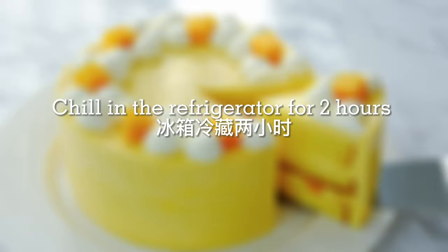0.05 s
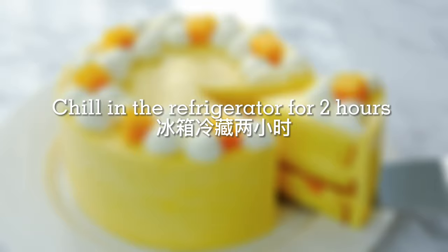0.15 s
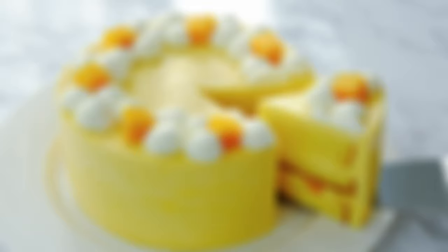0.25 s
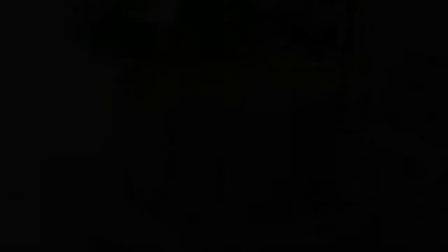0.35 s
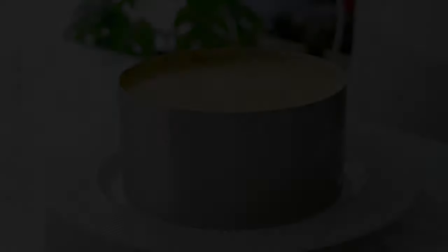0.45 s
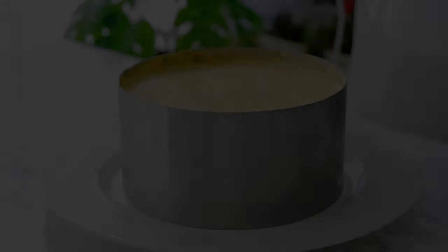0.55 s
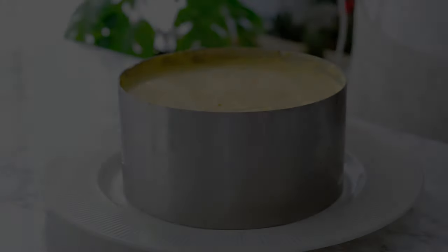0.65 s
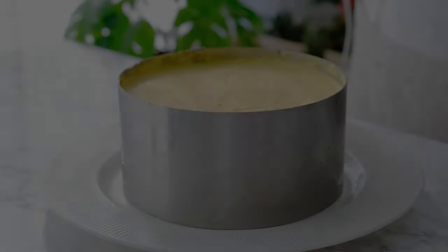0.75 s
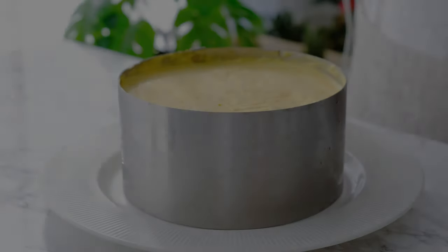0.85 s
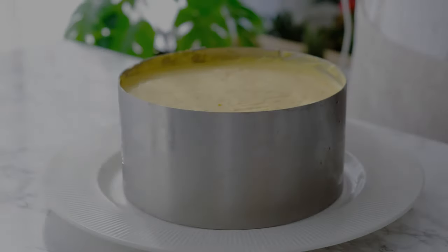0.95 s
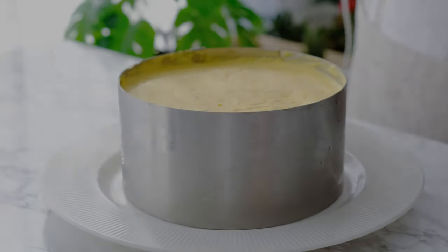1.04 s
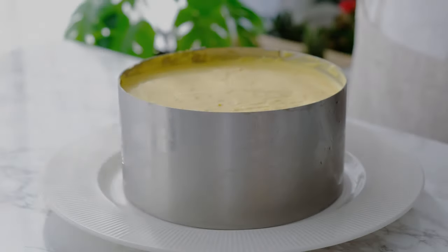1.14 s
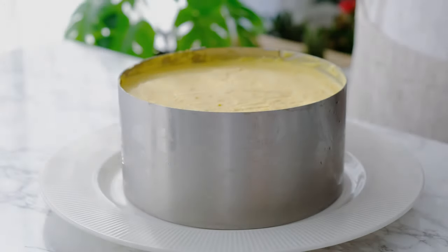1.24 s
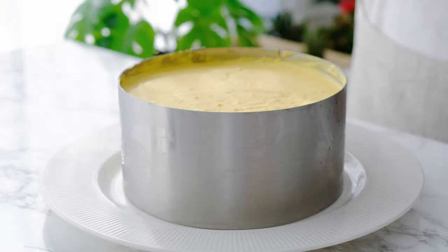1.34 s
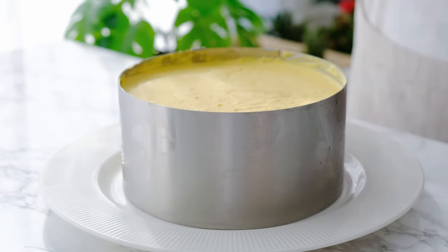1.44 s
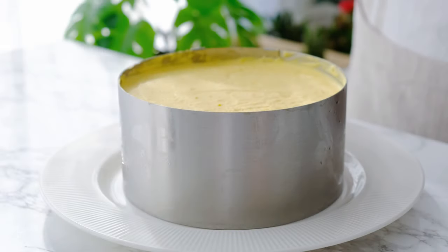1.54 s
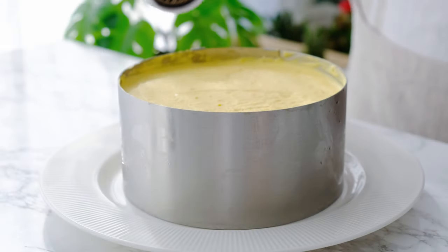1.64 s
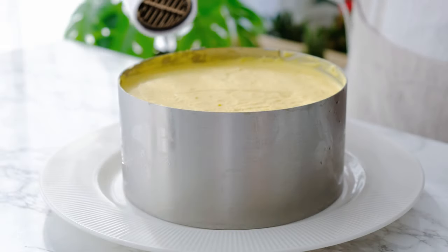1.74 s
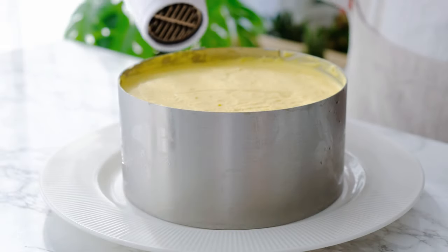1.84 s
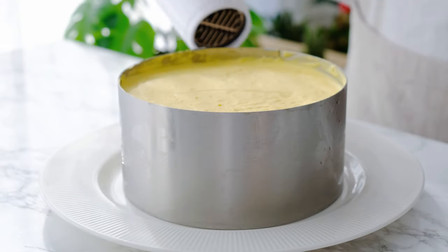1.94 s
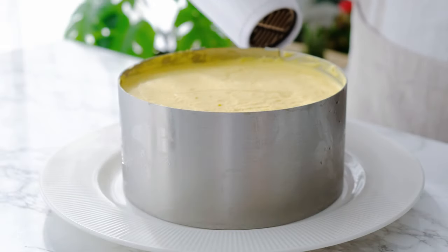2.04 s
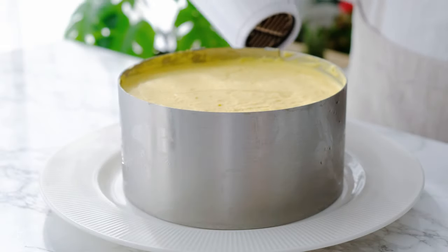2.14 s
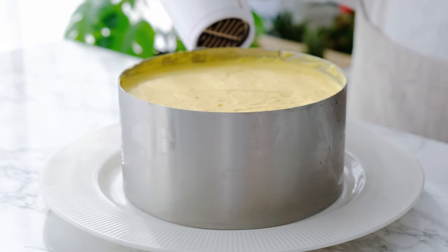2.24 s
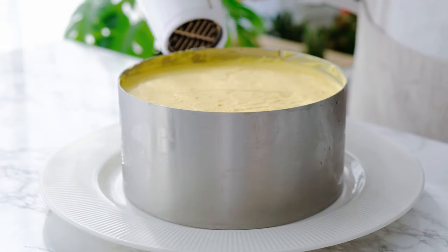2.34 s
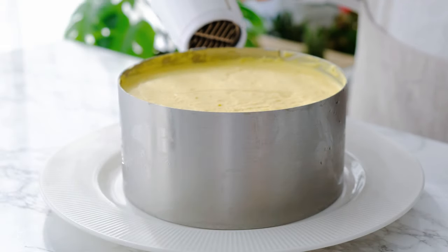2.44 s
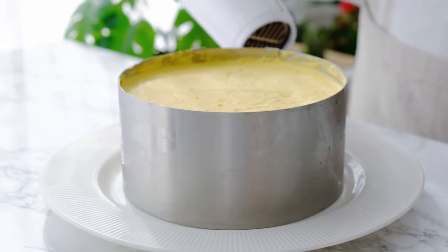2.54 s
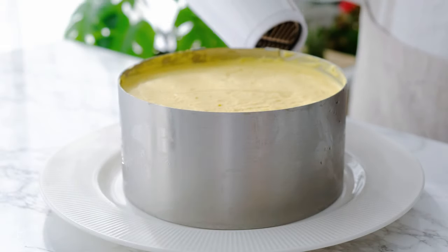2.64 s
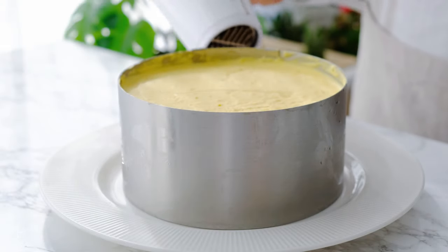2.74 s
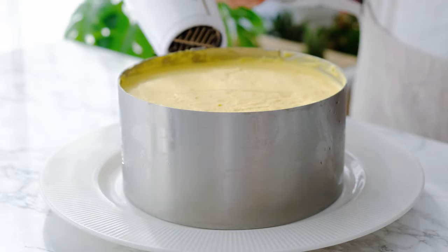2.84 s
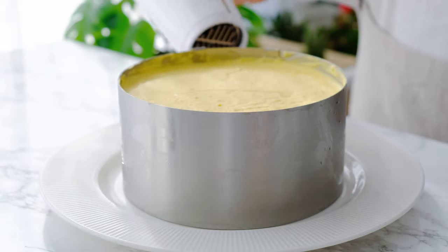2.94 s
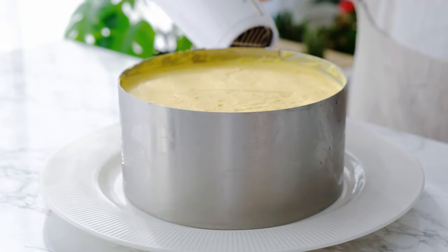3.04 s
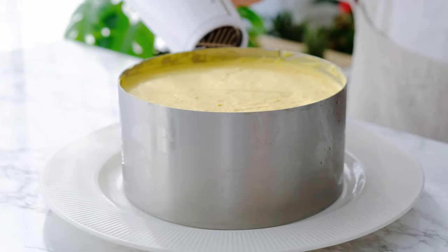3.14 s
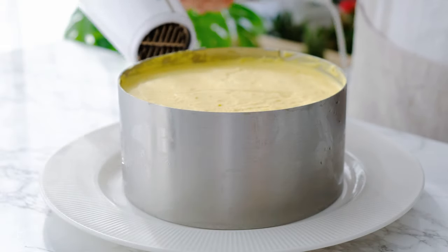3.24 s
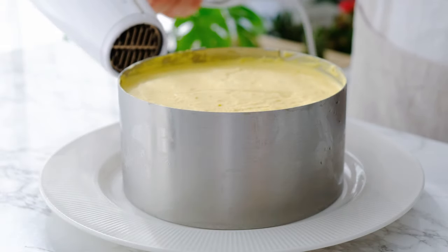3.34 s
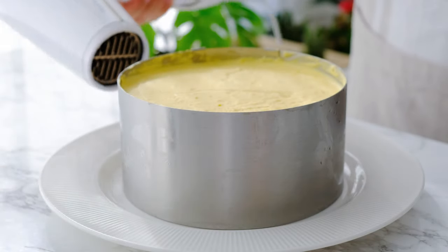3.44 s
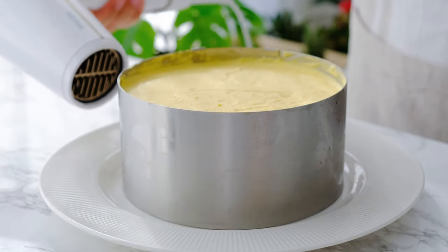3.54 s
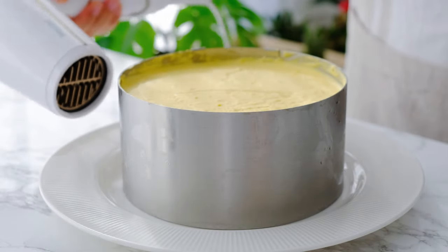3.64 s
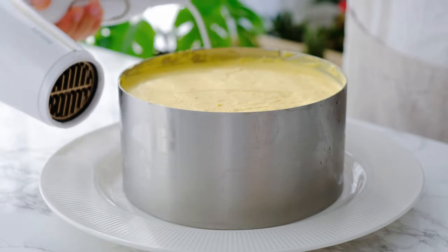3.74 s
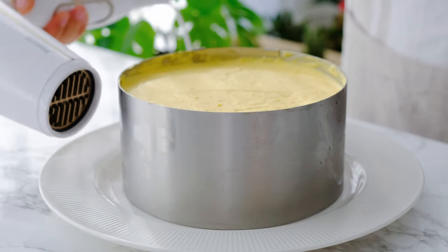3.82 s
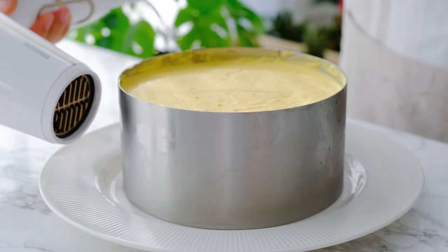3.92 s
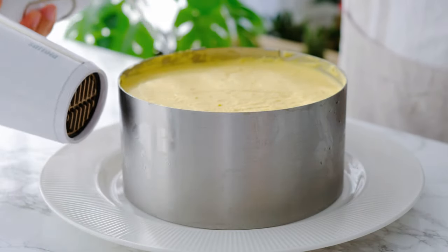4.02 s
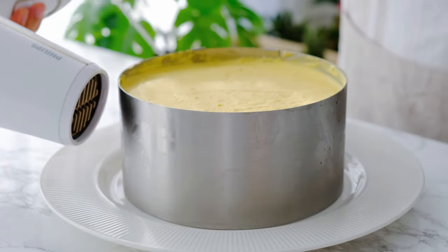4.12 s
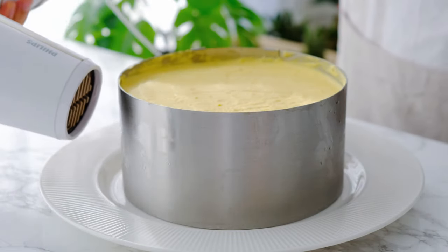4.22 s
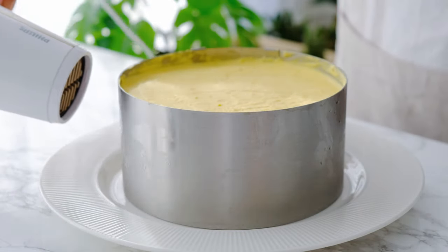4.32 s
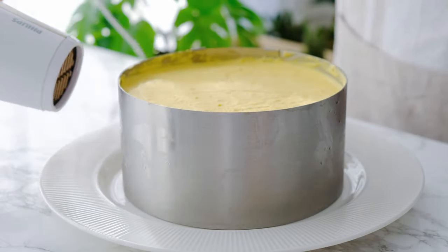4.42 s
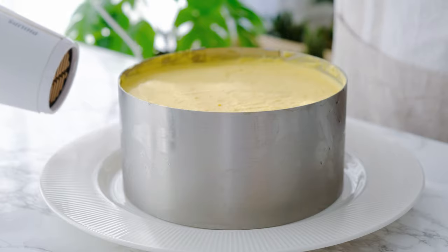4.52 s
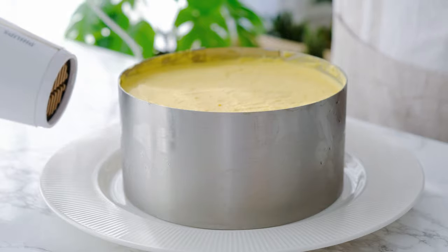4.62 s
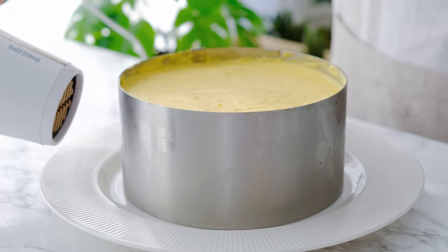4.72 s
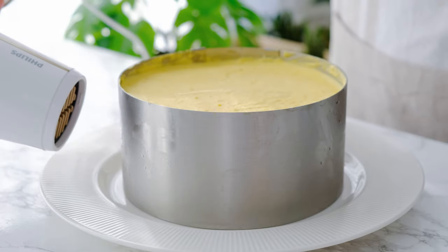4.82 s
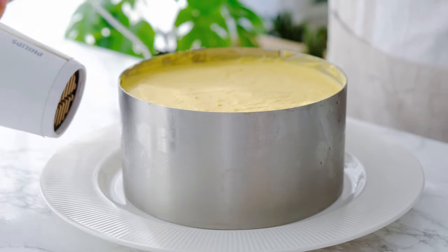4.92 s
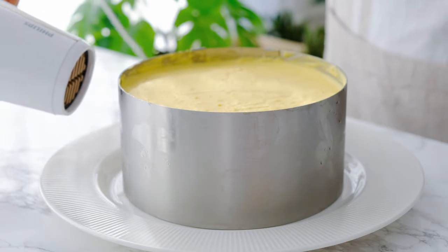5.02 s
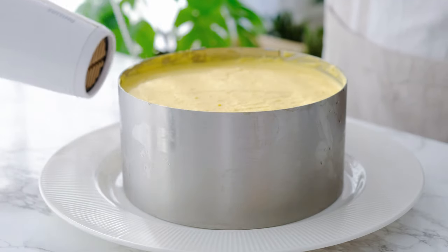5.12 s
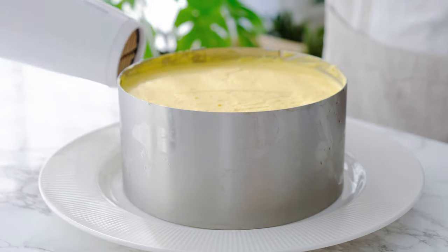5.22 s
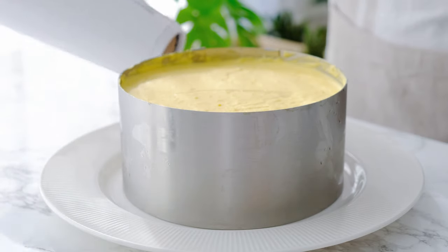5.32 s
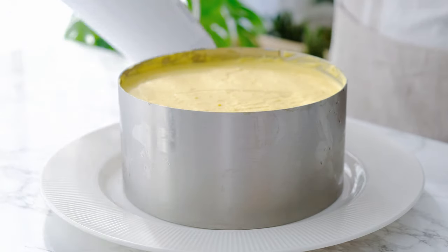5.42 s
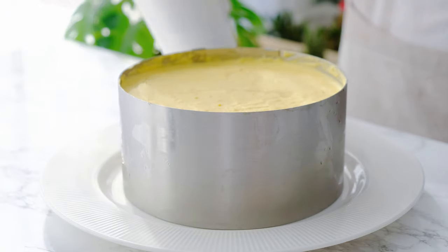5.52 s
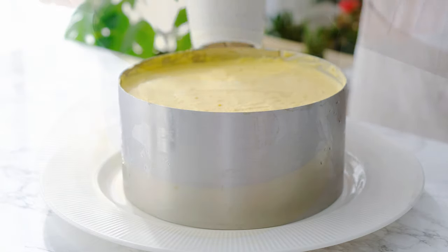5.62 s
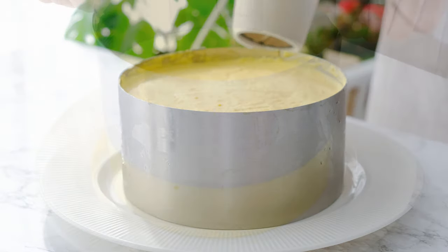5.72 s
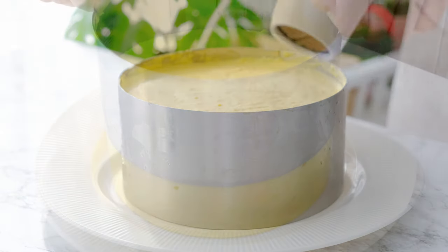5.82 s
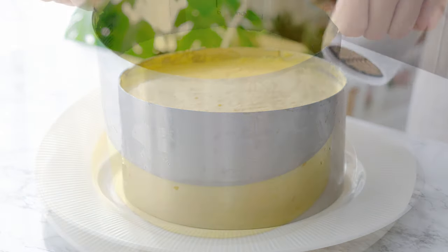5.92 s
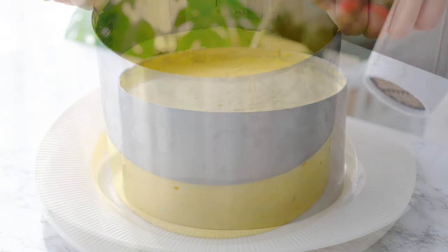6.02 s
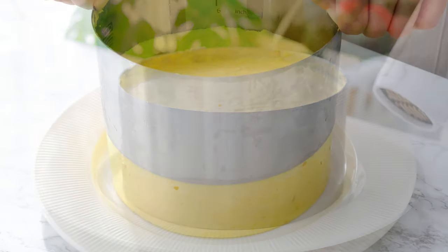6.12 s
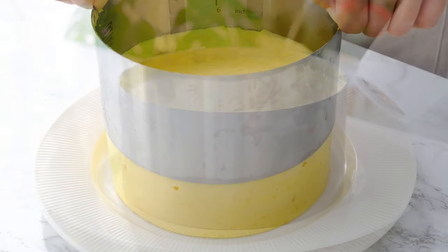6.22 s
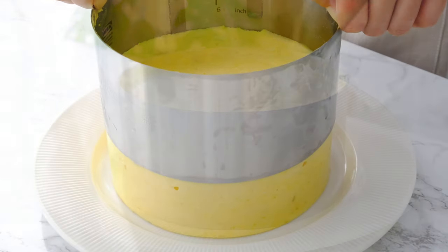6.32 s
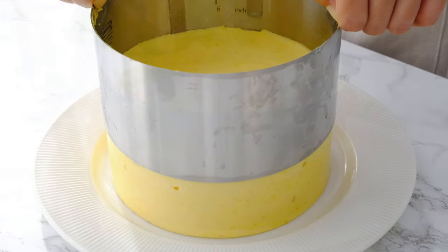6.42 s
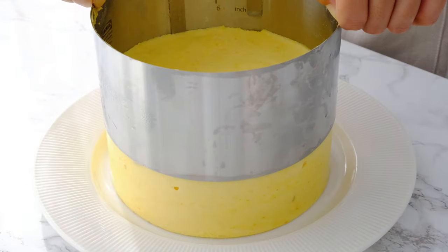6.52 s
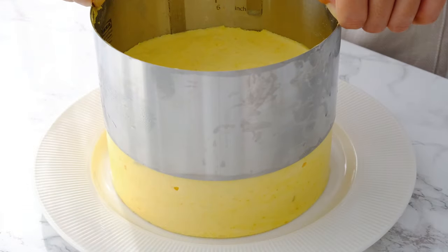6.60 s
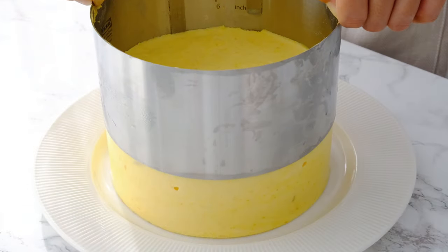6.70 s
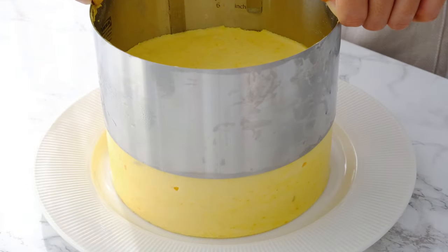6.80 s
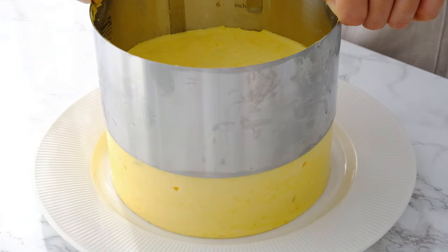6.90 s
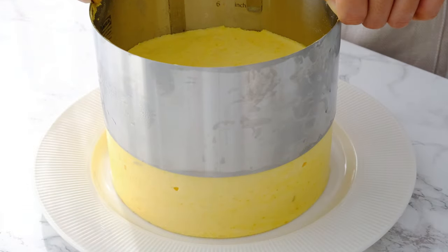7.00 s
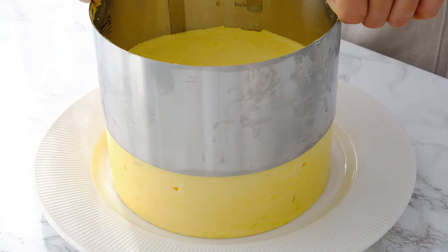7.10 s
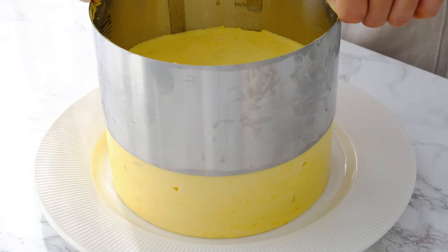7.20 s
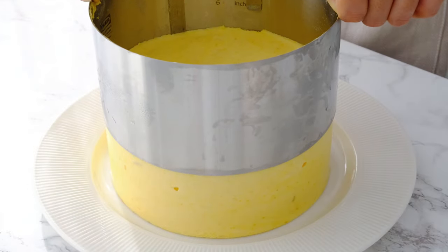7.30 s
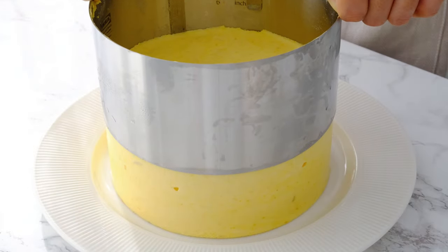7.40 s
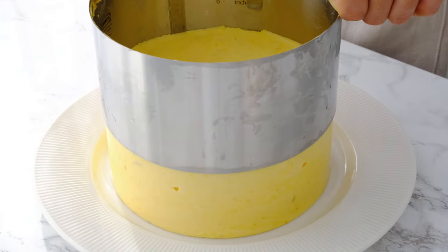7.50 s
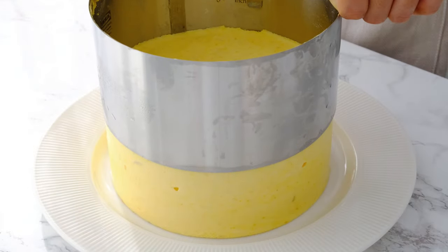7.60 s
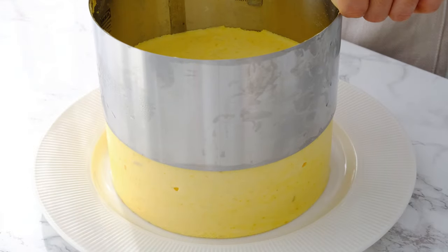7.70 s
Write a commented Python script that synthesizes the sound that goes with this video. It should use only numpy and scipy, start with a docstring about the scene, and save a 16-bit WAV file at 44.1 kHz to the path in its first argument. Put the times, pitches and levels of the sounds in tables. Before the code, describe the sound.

A hair dryer spins up, blows with a roar and thin whine, then fades away before two light metal ticks.

```python
"""A hand-held hair dryer spins up and is moved around a metal cake ring on a kitchen table.
Its turbulent jet roars through the resonances of barrel, grille and ring, louder and hollower where
it plays on the ring, under the thin whine of the fan blades. The dryer fades away into the hum of
the kitchen; the ring ticks twice and rubs softly as it is lifted off the cake."""
import sys
import numpy as np
from scipy import signal
from scipy.fft import rfft, irfft
from scipy.io import wavfile
from scipy.ndimage import uniform_filter1d

SR = 44100
rng = np.random.default_rng(int(sys.argv[2]) if len(sys.argv) > 2 else 0)


def to_wav(s):
    """Save 16-bit WAV."""
    ch = np.atleast_2d(s).T  # columns
    pcm = np.round(np.clip(ch, -1, 1) * 32767)  # PCM
    wavfile.write(sys.argv[1], SR, pcm.astype(np.int16))


N = 341943
TIME = np.arange(N) / SR
FRAME, HOP = 1024, 256
FRAME_S = np.arange(N // HOP + 5) * HOP / SR
BIN_HZ = np.fft.rfftfreq(FRAME, 1 / SR)


def amp(db):
    """Decibels to gain."""
    return 10 ** (np.asarray(db) / 20)


def unit(x):
    """Scales to rms 1."""
    return x / np.sqrt(np.mean(x ** 2) + 1e-20)


def along(rows, t):
    """Every column of an envelope at the times t."""
    times, *columns = np.transpose(rows)
    return [np.interp(t, times, c) for c in columns]


def across(rows):
    """Every column of an EQ curve at the bin frequencies."""
    hz, *columns = np.transpose(rows)
    return [np.interp(np.log(BIN_HZ + 1), np.log(hz), c) for c in columns]


def bell(x, centre, width):
    """A smooth bump of height 1."""
    return np.exp(-.5 * ((x - centre) / width) ** 2)


def wander(rate_hz):
    """Random modulation of rms 1, with nothing much faster than the rate."""
    low_pass = bell(np.fft.rfftfreq(N, 1 / SR), 0, rate_hz)
    return unit(irfft(rfft(rng.standard_normal(N)) * low_pass, N))


def noise(gain):
    """Noise shaped by a gain for each frame and bin."""
    white = rng.standard_normal(len(FRAME_S) * HOP)
    spectra = signal.stft(white, nperseg=FRAME, noverlap=FRAME - HOP)[2]
    shaped = spectra[:, :len(FRAME_S)] * gain.T * np.sqrt(len(BIN_HZ))
    return signal.istft(shaped, nperseg=FRAME, noverlap=FRAME - HOP)[1][:N]


# colour of the room tone: f/Hz, relative level/dB
ROOM_COLOUR = [(18, -40), (30, -9), (97, -7.5), (150, -9), (195, -12), (253, -9.5), (312, -1), (346, -13.5),
               (415, -5), (485, -4.5), (645, -11), (859, -11.5), (2920, -19.5), (15000, -23.5)]
# its stereo width: f/Hz, side against middle/dB
ROOM_WIDTH = [(100, -34), (500, -24), (1500, -27), (5000, -20), (14000, -11)]
# partials of the appliance hum: f/Hz, level before the fader/dB
APPLIANCE_HUM = [(50, -95), (150.5, -83), (345, -79), (495, -83.5), (689, -87), (1287, -88.5),
                 (1583, -89.5)]
# fader that brings in room tone and hum: t/s, gain/dB
ROOM_FADER = [(5.3, -52), (5.6, -19), (5.9, 3.5), (6.3, 2), (7.7, 2.5)]

def kitchen(air_trim_db=-68.5, waver_db=2.0):
    """Soft room tone, wider in the treble, and the wavering hum of an appliance."""
    colour = amp(across(ROOM_COLOUR)[0])[None]
    colour = colour / np.linalg.norm(colour)
    middle = noise(colour)
    side = noise(colour * amp(across(ROOM_WIDTH)[0]))
    low_cut = signal.butter(4, 38, "highpass", fs=SR, output="sos")
    air = signal.sosfilt(low_cut, [middle + side, middle - side])
    hum = sum(amp(db + waver_db * wander(rate_hz=2.8)) * np.sin(2 * np.pi * (hz * TIME + rng.random()))
              for hz, db in APPLIANCE_HUM)
    fader = amp(along(ROOM_FADER, TIME)[0]) * (TIME > ROOM_FADER[0][0])
    return (amp(air_trim_db) * air + np.sqrt(2) * hum) * fader


# dull low resonances of ring and plate: f/Hz, half width/Hz, relative level/dB
BODY_MODES = [(194.5, 17, 2), (276, 32, -10.5), (340, 29, -5), (153, 24, -9)]
# tugs on the ring: t/s, level/dB
TUGS = [(6.88, -66), (7.085, -57.5), (7.338, -58)]

def ring_slide(start_s=6.78, attack_s=0.11, hold_s=0.46, release_s=0.38, rub_db=-64, tug_s=0.032):
    """Uneven friction on the cake stirs the low modes of ring and plate; tugs swell the strongest."""
    modes = [amp(db) * bell(BIN_HZ, hz, width)[None] for hz, width, db in BODY_MODES]
    corners_s = start_s + np.cumsum([0, attack_s, hold_s, release_s])
    rub = amp(rub_db) * np.interp(TIME, corners_s, [0, 1, 1, 0]) * unit(noise(sum(modes)))
    tugs = sum(amp(db) * bell(TIME, s, tug_s) for s, db in TUGS) * unit(noise(modes[0]))
    slip_db = -0.5 * wander(rate_hz=33)
    return (rub + tugs) * amp(slip_db)


# hits of switch, ring nudge and ring tick: t/s, peak/dB, grit decay/s, grit/0-1, direct crack/0-1
KNOCKS = [(0.57, -66.5, 0.0045, .6, 1), (6.522, -51, 0.01, .5, .45), (6.597, -44.5, .008, 0.07, 0.15)]
# the modes each hit rings: f/Hz, relative level/dB, t60/s
SWITCH_MODES = [(446, 3, 0.056), (1220, -4, .035), (1390, 20, 0.038), (2056, 1, .035), (2637, -4, .035),
                (3521, -1, .03), (4400, 8, .03)]
NUDGE_MODES = [(1104, -5, .06), (1340, -2, 0.052), (1755, -9, .05), (2697, -9, .05), (4500, -16, .05)]
TICK_MODES = [(1723, -12, .04), (2003, -13, .08), (3500, -10, .046), (4430, -3, .05), (4520, 2, 0.068)]

def knock(start_s, peak_db, grit_s, grit, crack, modes):
    """A short contact with a gritty tail rings the modes; some of it is heard directly as a crack."""
    t = TIME[:SR // 4]
    contact = grit * rng.standard_normal(len(t)) * np.exp(-t / grit_s)
    contact[0] = 1
    ringing = sum(amp(db - 60 * t / t60) * np.sin(2 * np.pi * hz * t) for hz, db, t60 in modes)
    body = unit(signal.fftconvolve(contact, ringing)[:len(t)])
    crack_band = signal.butter(1, [250, 3000], "bandpass", fs=SR, output="sos")
    hit = body + crack * unit(signal.sosfilt(crack_band, contact))
    return np.pad(amp(peak_db) * hit / abs(hit).max(), (round(start_s * SR), N))[:N]


MOTOR_ON_S = 0.6

def spin(t, time_constant_s=0.185):
    """Share of full speed while the motor runs up."""
    return 1 - np.exp(-np.maximum(t - MOTOR_ON_S, 0) / time_constant_s)


def rise_db(t, power, fade_start_s=0.62, fade_length_s=1):
    """The dryer fades in and grows as a power of the fan speed."""
    fade_in = np.clip((t - fade_start_s) / fade_length_s, 0, 1)
    return 20 * np.log10(fade_in * spin(t) ** power + 1e-9)


def motor_drone(pitch_hz=727, trim_db=-67.5, roughness=0.28, brush_db=-3):
    """The motor drones and its brushes rustle in the run-up; both fall quiet as its current drops."""
    speed = spin(TIME)
    swell = speed * np.sqrt(1 - speed) * (1 + roughness * wander(rate_hz=30))
    brush_colour = bell(BIN_HZ, 600, 1500) * (1 - bell(BIN_HZ, 0, 250))
    brushes = amp(brush_db) * unit(noise(brush_colour[None]))
    tone = np.sqrt(2) * np.sin(2 * np.pi * pitch_hz * TIME)
    return amp(trim_db) * swell * (tone + brushes)


# path of the nozzle: t/s, aim/0-1
NOZZLE_AIM = [(0.9, 0.45), (1.5, 0.51), (2.0, 0.83), (3.3, 1), (3.5, 0.8), (3.9, 0), (5.1, 0.0),
              (5.45, 0.43), (5.7, 0.75), (6.0, 0.66)]

def aim_at(t):
    """Where the nozzle points: 0 is past the ring, 1 is onto it."""
    return np.clip(along(NOZZLE_AIM, t)[0], 0, 1)


def blend(aim, onto, past):
    """Crossfades between a value onto the ring and its value past the ring."""
    return aim * onto + (1 - aim) * past


# roar at full speed, high over the ring and lower off it: t/s, level before the fades/dB
ROAR_LEVEL = [(1.3, -38), (1.48, -37.5), (1.9, -36), (2.5, -36.5), (2.67, -36), (3.1, -35.5),
              (3.412, -35.5), (3.44, -44), (3.83, -45.5), (4.0, -45), (4.5, -47.5), (4.72, -47),
              (5.1, -46.5), (5.3, -45.5), (5.6, -47), (6.0, -44.5), (6.1, -47)]
# hiss, a narrow beam that drops first as the nozzle swings away: t/s, level before the fades/dB
HISS_LEVEL = [(1.06, -44), (1.22, -49), (1.5, -47.5), (1.85, -46.5), (3.33, -46.5), (3.395, -57),
              (3.7, -55.5), (3.84, -58), (4.05, -56), (4.65, -58.5), (5.3, -57.5), (5.9, -54.5), (6.2, -61)]

def air_levels_db(t, filled_s=2.12, thin_db=-4, buffet_trim_db=-4.5, fade_s=5.373, fade_db_per_s=27):
    """Buffeting, roar and hiss rise with the fan and later fade out; the young jet is thin in the bass."""
    fade_db = fade_db_per_s * np.maximum(t - fade_s, 0)
    body_db = along(ROAR_LEVEL, t)[0] - fade_db
    thinness = np.clip(2 * (filled_s - t) / (filled_s - MOTOR_ON_S), 0, 1)
    buffet_db = body_db + rise_db(t, power=2.6) + buffet_trim_db + thin_db * thinness
    roar_db = body_db + rise_db(t, power=2.2)
    hiss_db = along(HISS_LEVEL, t)[0] + rise_db(t, power=2.8) - fade_db
    return buffet_db, roar_db, hiss_db


# blade rate at full speed: t/s, f/Hz
BLADE_RATE = [(1.8, 1666), (3.06, 1670), (4.19, 1665), (5.07, 1672), (5.51, 1664), (6.1, 1668)]

def blade_hz(t):
    """Pitch of the blades: the run-up, then a slight drift."""
    return along(BLADE_RATE, t)[0] * spin(t)


# blade whine, swelling and sinking as the dryer turns: t/s, level before trim and fades/dB
WHINE_LEVEL = [(1.3, -36.5), (1.39, -44.5), (1.48, -41), (1.5, -51), (1.61, -35.5), (1.78, -34),
               (2.2, -43.5), (2.31, -37), (2.73, -44), (2.84, -37), (3.13, -41), (3.39, -35.5), (3.52, -51),
               (3.82, -51), (4.03, -43), (4.56, -45.5), (4.64, -43), (5.09, -45.5), (5.3, -54.5),
               (5.56, -45.5), (5.8, -71.5), (5.94, -56.5), (6.2, -77.5)]
# fainter partials of the fan: multiples of the shaft speed
SHAFT_ORDERS = [1, 5, 6, 14, 21, 26]
# their levels against the roar: onto the ring/dB, past it/dB
ORDER_LEVELS = [(-30.5, -25.5), (-48, -12.5), (-25, -39), (-15.5, -20.5), (-22, -36), (-24.5, -35)]

def fan(blades=7, jitter=0.00076, shimmer_db=0.3, flutter=0.085, trim_db=1.6, fall_db_per_s=72):
    """The blades whine as the shaft turns, other shaft orders sing faintly and the mains hums beneath."""
    shaft_hz = blade_hz(TIME) / blades * (1 + jitter * wander(rate_hz=36))
    angle = 2 * np.pi * np.cumsum(shaft_hz) / SR
    fall_db = fall_db_per_s * np.maximum(TIME - WHINE_LEVEL[-1][0], 0)
    whine_db = along(WHINE_LEVEL, TIME)[0] + trim_db + rise_db(TIME, power=6.4) - fall_db
    # uneven inflow makes the blade tone shimmer and flutter
    whine_gain = amp(whine_db + shimmer_db * wander(rate_hz=57)) * (1 + flutter * wander(rate_hz=89))
    tones = whine_gain * np.sin(blades * angle)
    aim, at_speed = aim_at(TIME), spin(TIME) ** 20
    _, roar_db, _ = air_levels_db(TIME)
    for order, levels_db in zip(SHAFT_ORDERS, ORDER_LEVELS):
        level_db = roar_db + blend(aim, *levels_db) + 1.7 * wander(rate_hz=30)
        tones += amp(level_db) * at_speed * np.sin(order * angle + 2 * np.pi * rng.random())
    mains = amp(roar_db - 48) * np.sin(2 * np.pi * 100 * TIME)
    return np.sqrt(2) * (tones + mains)


# breathy whistles: t/s, half length/s, f/Hz, half width/Hz, boost/dB
EDGE_TONES = [(1.483, 0.091, 1490, 80, 11), (2.003, 0.02, 2100, 130, 7.5), (3.087, 0.063, 2280, 90, 4.5),
              (3.207, 0.042, 2020, 110, 3), (3.346, 0.027, 3800, 450, 6.5), (3.477, 0.04, 2220, 170, 8.5),
              (5.676, 0.11, 970, 130, 7.5), (5.695, 0.15, 2370, 110, 7), (5.996, .05, 3460, 600, 9.5)]

def edge_whistles_db():
    """Brief narrow boosts where the jet catches an edge."""
    return sum(boost_db * np.outer(bell(FRAME_S, s, length), bell(BIN_HZ, hz, width))
               for s, length, hz, width, boost_db in EDGE_TONES)


# air modes of the ring's open top: f/Hz, half width/Hz, boost at full aim/dB
RIM_MODES = [(1987, 59, 6.5), (2274, 125, 5.5)]

def rim_modes_db(aim, threshold=0.49, surge_db=3.4):
    """Blowing across the ring sounds its air modes, each surging at random."""
    over_rim = np.clip((aim - threshold) / (1 - threshold), 0, 1)
    db = 0
    for hz, width, boost_db in RIM_MODES:
        surge = np.interp(FRAME_S, TIME, wander(rate_hz=7))[:, None]
        db = db + over_rim * (boost_db + surge_db * surge) * bell(BIN_HZ, hz, width)
    return db


def balance_bands(db):
    """Rides the low, middle and high bands of a spectrum toward the levels of buffeting, roar and hiss."""
    bands_hz = [(100, 750), (900, 4000), (6000, 15000)]
    # crossovers: f/Hz, then the shares of the three bands
    shares = across([(600, 1, 0, 0), (1000, 0, 1, 0), (2600, 0, 1, 0), (6500, 0, 0, 1)])
    power = amp(db) ** 2
    for (lo, hi), share, level_db in zip(bands_hz, shares, air_levels_db(FRAME_S)):
        band_db = 10 * np.log10(power[:, (BIN_HZ > lo) & (BIN_HZ < hi)].sum(1))
        db = db + np.outer(level_db - band_db, share)
    return db


# colour of the turbulence: f/Hz, relative level onto the ring/dB, past it/dB
JET_COLOUR = [(40, -63, -57), (70, -33, -40), (110, -22, -32.5), (251, -9, -20.5), (497, -2.5, -13.5),
              (772, -11.5, -16), (1266, 0.5, -13.5), (2730, -3.5, -13.5), (4860, -9.5, -19.5),
              (7050, -11.5, -16.5), (11070, -22, -29), (15400, -29, -36.5)]
# resonances of barrel, grille and ring: f/Hz, half width/Hz, boost onto the ring/dB, past it/dB
CAVITIES = [(326.5, 13, 8, 2), (550, 75, 7.5, 5.5), (645, 17, 9, -2), (711, 34, 9, 4.5),
            (984, 140, 6.5, -1.5), (1440, 34, 3, 2.5), (3058, 69, -1.5, 3), (3873, 138, 3, 5.5),
            (4494, 270, 7, 6.5), (5230, 200, 4.5, 5.5), (6100, 240, 1.5, 3.5), (7700, 200, 1.5, 0),
            (9000, 182, 0.2, 3), (10740, 260, 2, 1)]

def air_jet(wake_db=3.5, deep_cut_db=-10, eddy_db=1.3, sway_db=0.02, ripple_db=1.5):
    """Jet turbulence roars through the cavities, coloured by the aim and stirred by eddies."""
    aim, speed = aim_at(FRAME_S)[:, None], spin(FRAME_S)[:, None]
    db = blend(aim, *across(JET_COLOUR))
    for hz, width, onto_db, past_db in CAVITIES:
        db += blend(aim, onto_db, past_db) * bell(BIN_HZ, hz, width)
    # the wakes of the blades put a breathy skirt around the whine
    db += wake_db * speed * (1 - aim) * bell(BIN_HZ, blade_hz(FRAME_S)[:, None], width=105)
    db = balance_bands(db) + rim_modes_db(aim) + edge_whistles_db()
    # deep buffeting builds only once the fan is at speed
    db += deep_cut_db * (1 - speed ** 4) * bell(BIN_HZ, 0, 145)
    eddies = uniform_filter1d(rng.standard_normal(db.shape), size=14, axis=0)
    eddies = unit(uniform_filter1d(eddies, size=6, axis=1))
    hand_sway = np.interp(FRAME_S, TIME, wander(rate_hz=5.5))[:, None]
    # reflections off table and ring colour the roar with a fine ripple that fades toward the treble
    onto, past = rng.standard_normal((2, len(BIN_HZ))) * bell(BIN_HZ, 0, 5000)
    ripple = np.sqrt(aim) * onto + np.sqrt(1 - aim) * past
    return noise(amp(db + eddy_db * eddies + sway_db * hand_sway + ripple_db * ripple))


# brief pans to the left: t/s, half length/s, left minus right of the air/dB, of the fan/dB
LEFT_LEANS = [(3.42, .035, 3.3, 2.0), (5.52, .045, 1.0, 5.0), (5.97, .08, 1.0, 3.5), (6.38, .08, 2.0, 2.0)]

def dryer():
    """Air and fan sit in the centre and now and then lean to the left."""
    air_lean_db, fan_lean_db = sum(np.outer(db, bell(TIME, s, length)) for s, length, *db in LEFT_LEANS)
    sides = np.array([[.5], [-.5]])
    return air_jet() * amp(sides * air_lean_db) + fan() * amp(sides * fan_lean_db)


def scene():
    """The dryer, then the quiet kitchen with the ring being lifted."""
    knock_modes = (SWITCH_MODES, NUDGE_MODES, TICK_MODES)
    knocks = sum(knock(*row, modes) for row, modes in zip(KNOCKS, knock_modes))
    return kitchen() + ring_slide() + knocks + motor_drone() + dryer()


def record(dry):
    """A steep high cut takes off the very top."""
    low_pass = signal.firwin(1023, cutoff=15480, window=("kaiser", 10), fs=SR)
    return signal.oaconvolve(dry, low_pass[None], "same", axes=1)


dry = scene()
out = record(dry)
to_wav(out)
```